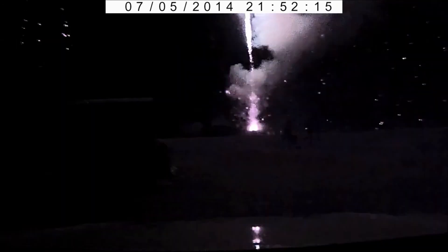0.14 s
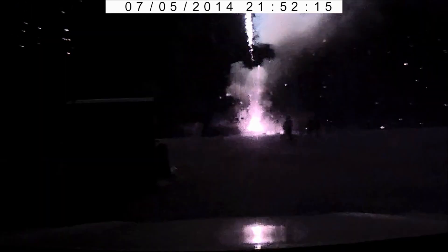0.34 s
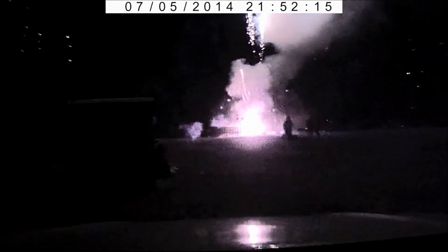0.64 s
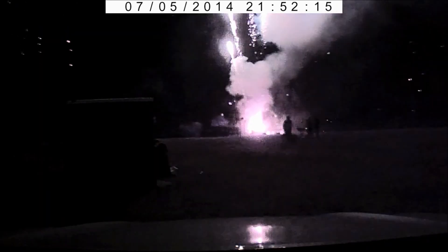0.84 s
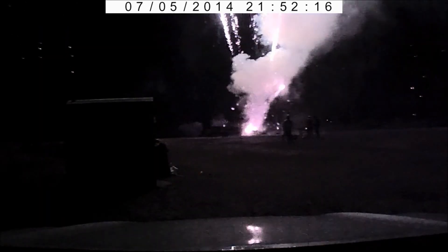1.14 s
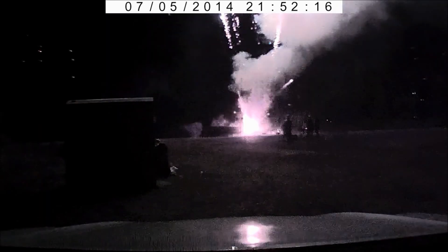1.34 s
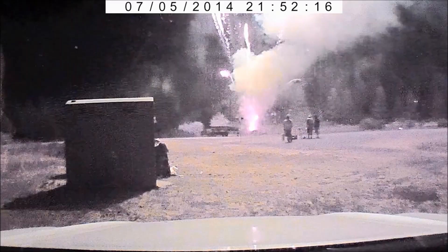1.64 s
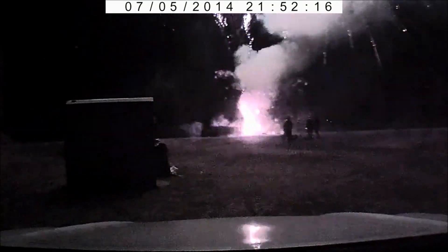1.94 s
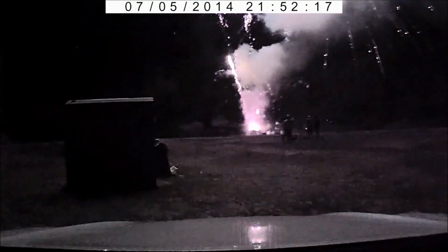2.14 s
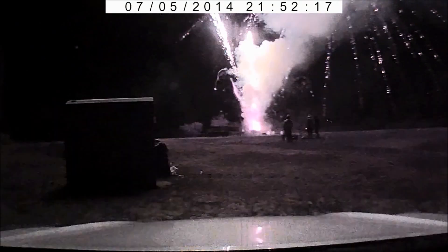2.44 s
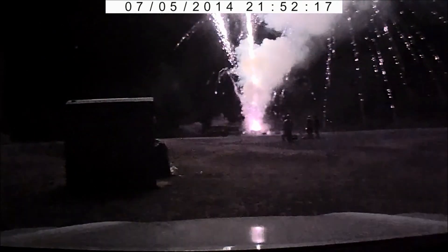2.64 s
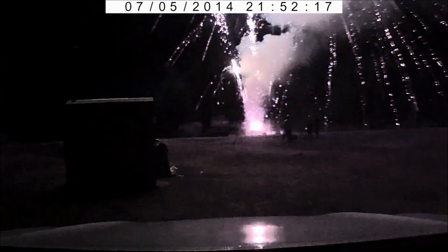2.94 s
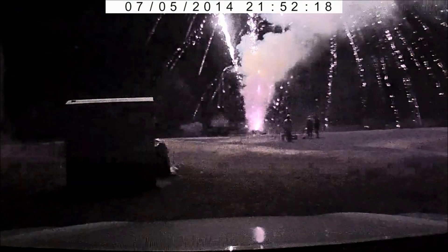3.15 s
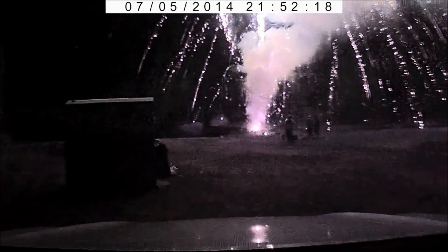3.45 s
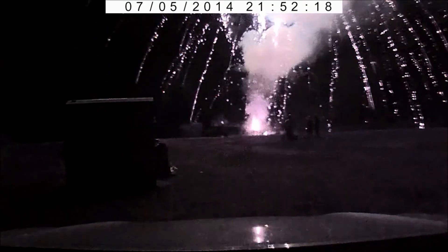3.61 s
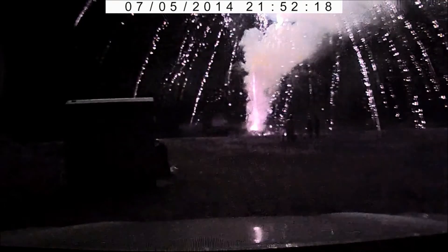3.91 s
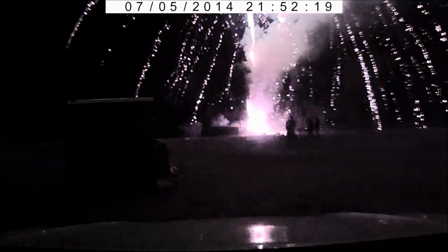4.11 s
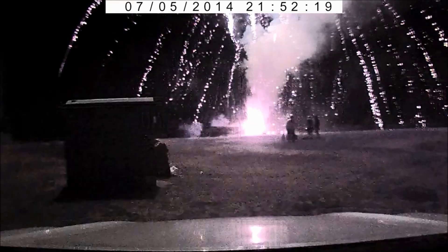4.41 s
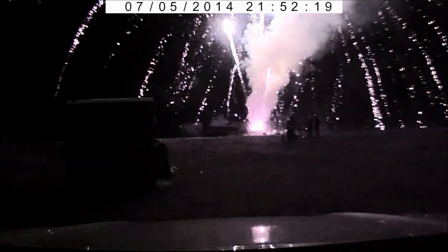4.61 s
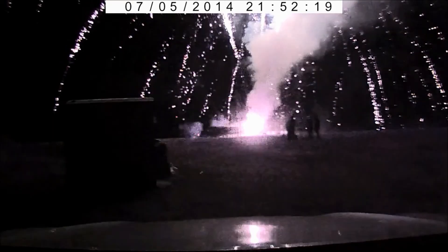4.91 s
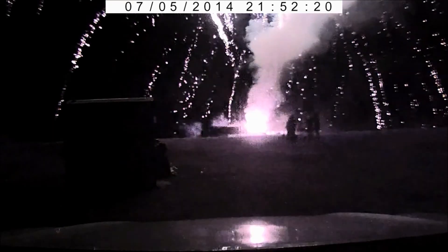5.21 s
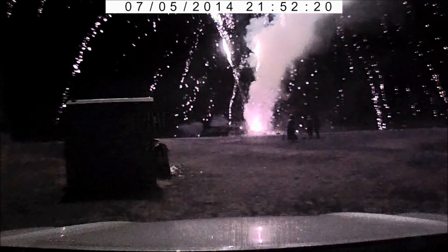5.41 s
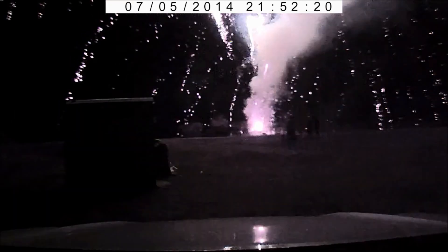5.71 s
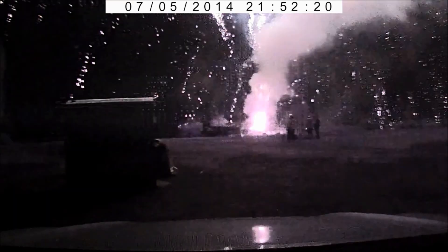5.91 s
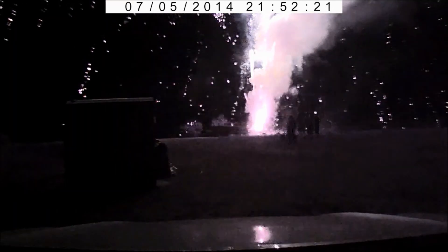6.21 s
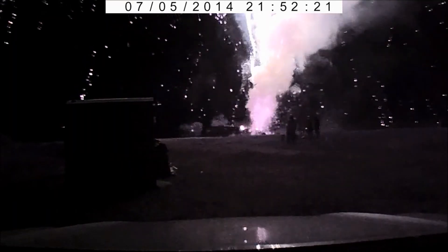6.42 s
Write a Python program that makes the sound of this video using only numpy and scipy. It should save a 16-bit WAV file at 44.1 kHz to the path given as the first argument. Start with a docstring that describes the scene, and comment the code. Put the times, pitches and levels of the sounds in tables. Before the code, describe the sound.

Inside a parked car facing a field, a firework battery fires without pause. Crisp shell cracks on small round thumps overlap dull launch booms that slap the windscreen and ring the cabin. A tree line returns each bang as long, low rolling noise. Launches grow heavier after the middle. Faint sparks crackle, and the overloaded microphone flattens peaks with bright grit.

```python
"""A firework battery fires shell after shell in a field, heard by a dash camera inside a parked car.
Over distant rumble and hiss, shells pop overhead from the start, each a noise crack on a small round thump.
The tree line rolls every bang back as long low noise; launches slap the glass and ring the cabin's air modes.
Bright overload grit rides on the big pressure swings; faint sparks crackle at random moments throughout.
The microphone flattens whatever exceeds its full scale."""
import sys
import numpy as np
from scipy import signal
from scipy.fft import rfft, irfft
from scipy.io import wavfile
from scipy.ndimage import uniform_filter1d

SR = 44100
rng = np.random.default_rng(int(sys.argv[2]) if len(sys.argv) > 2 else 0)


def master_out(mix):
    """Clip the mix to full scale and print it as 16-bit PCM to the path in sys.argv[1]."""
    frames = np.transpose(np.atleast_2d(mix))
    ceiling = np.clip(frames, -1, 1)
    pcm = np.round(ceiling * 32767).astype(np.int16)
    wavfile.write(sys.argv[1], SR, pcm)


N = 289296

# The crisp crack of a shell opening. Each row: frequency in Hz, gain in dB.
CRACK_COLOUR = [(30, 27.5), (400, -16.5), (650, 0), (1100, 6), (1800, -10), (2700, -7.5), (3300, -17),
                (4300, -11.5), (5200, -34), (8000, -44), (15000, -49)]
# What the car's shell lets through of a bang. Each row: frequency in Hz, gain in dB.
LAUNCH_COLOUR = [(30, 17), (80, 24), (130, 33), (250, 33.5), (400, 22.5), (650, 17.5), (1000, 14.5),
                 (1500, 7), (2200, -4), (3200, -7), (4000, -4), (5000, -16), (8000, -25.5), (15000, -25.5)]


def undb(db):
    """Decibels to gain."""
    return 10 ** (np.asarray(db) / 20)


def seconds(length):
    """Time axis of a sound, in seconds."""
    return np.arange(int(length * SR)) / SR


def fade(t, t60):
    """Exponential decay, 60 dB down after t60 seconds."""
    return np.exp(-np.log(1000) * t / t60)


def add(track, s, sound):
    """Mix a sound into a track at time s."""
    i = max(int(s * SR), 0)
    track[i:i + len(sound)] += sound[:N - i]


def convolve(x, response):
    """Pass a track through a response."""
    return signal.fftconvolve(x, response)[:N]


def colour(x, points, size=8192):
    """Causal minimum-phase filter through (Hz, dB) points, built from the cepstrum."""
    hz, db = np.transpose(points)
    grid = np.maximum(np.arange(size // 2 + 1) * SR / size, 1)
    gain = undb(np.interp(np.log(grid), np.log(hz), db))
    cepstrum = irfft(np.log(gain))
    # Folding the cepstrum onto positive time makes the response causal
    cepstrum[1:size // 2] *= 2
    cepstrum[size // 2 + 1:] = 0
    return convolve(x, irfft(np.exp(rfft(cepstrum))))


def lowpass(x, hz):
    """Gentle second-order low-pass."""
    sections = signal.butter(2, min(hz, .45 * SR), fs=SR, output="sos")
    return signal.sosfilt(sections, x)


def reflections(t, rise_s, decay_s, ragged_db, hold=0.77):
    """Noise cloud of uneven clumps, about unit energy; hold above 1 keeps it up, then drops it faster."""
    knots = np.arange(0, t[-1], .003)
    clumps = undb(ragged_db * np.interp(t, knots, rng.standard_normal(len(knots))))
    rise = 1 - np.exp(-t / rise_s)
    decay = fade((t / decay_s) ** hold, 0.93)
    envelope = rise * decay * clumps
    return rng.standard_normal(len(t)) * envelope / np.linalg.norm(envelope)


def background():
    """Distant rumble and microphone hiss: steady noise, strongest in the bass."""
    # Each row: frequency in Hz, level in dB
    floor = [(25, -38), (48, -14), (80, -13.5), (140, -22.5), (300, -35.5), (600, -40.5), (1100, -39),
             (1800, -55.5), (3900, -59), (5000, -69), (15000, -71.5)]
    return colour(rng.standard_normal(N), floor)


def hollow_note(t, start_hz, end_hz, fall_s, t60, db, vary=.05):
    """The hollow note of a charge going off in its card casing; it sinks as the hot gas cools."""
    hz = end_hz + (start_hz - end_hz) * np.exp(-t / fall_s)
    hz = hz * (1 + vary * rng.standard_normal())  # each charge is tuned a little differently
    tone = np.cos(2 * np.pi * np.cumsum(hz) / SR)
    return undb(db) * tone * fade(t, t60) * (1 - np.exp(-t / 0.0025))


def thump(t, rise_s, scatter_db, detune):
    """The cabin's modes after a pressure step; each direction of arrival weights them a little differently."""
    # Air and panel modes of the car. Each row: nominal frequency in Hz, relative level in dB, t60 in seconds
    cabin_modes = [(45.2, -27, 0.56), (52.5, -24, 0.49), (113.5, -29.5, 0.72), (130, -18, 0.082),
                   (150.8, -23.5, 0.26), (168.7, -17, 0.2), (183.3, -23, 0.29), (222.8, -12, 0.14),
                   (262.8, -19, 0.21), (297, -22.5, 0.11), (340.5, -27, 0.2), (430, -28.5, 0.061),
                   (494, -29, 0.21), (543, -30.5, 0.18), (623, -10.5, 0.042), (684.3, -22, 0.075),
                   (977, -25.5, 0.055), (1060, -31, 0.051)]
    hz, db, t60 = np.transpose(cabin_modes)[:, :, None]
    weight, shift = rng.standard_normal((2, len(cabin_modes), 1))
    level = undb(db + scatter_db * weight)
    tones = np.cos(2 * np.pi * hz * (1 + detune * shift) * t)
    modes = level * fade(t, t60) * tones
    return modes.sum(axis=0) * (1 - np.exp(-t / rise_s))  # the panels take a moment to give way


def bursts(scatter_db=-6, boom_db=-0.5):
    """Shells open high up: a short crisp crack on a small, round thump."""
    # The nearer shells overhead. Each row: start in seconds, crack level in dB
    shells = [(0.029, 1), (0.043, -2.5), (0.44, 1.5), (.582, 2), (0.7345, -5.5), (0.8594, 2.5),
              (1.0258, 0.5), (1.149, -0.5), (1.199, -11), (1.342, -11), (1.4966, 6), (1.579, 7.5),
              (1.627, 3), (1.7345, -0.5), (1.8374, -14.5), (2.197, 2), (3.079, -1.5), (3.2497, 1.5),
              (4.006, -1), (4.219, -2), (4.319, 4.5), (4.485, -3), (4.608, 1), (5.1166, 5), (5.4254, -2),
              (5.444, 5), (5.6731, 2), (6.0684, -1), (6.181, -3.5), (6.2556, 2.5), (6.3461, 3.5),
              (6.4611, 0)]
    t = seconds(.5)
    boom, scattered, crack = np.zeros((3, N))
    for s, crack_db in shells:
        thump_db = -11.5 + crack_db  # the thump follows the crack's level
        add(crack, s, undb(crack_db) * reflections(t, rise_s=0.00027, decay_s=0.14, ragged_db=2))
        cloud = reflections(t, rise_s=0.0032, decay_s=0.093, ragged_db=6.0, hold=0.96)
        add(scattered, s, undb(thump_db + scatter_db) * cloud)
        note = hollow_note(t, start_hz=185.4, end_hz=127.8, fall_s=0.032, t60=0.11, db=-5.0)
        cabin = thump(t, rise_s=0.019, scatter_db=4.5, detune=0.0098)
        add(boom, s, undb(thump_db + boom_db) * (note + cabin))
    return boom + colour(scattered, LAUNCH_COLOUR) + colour(crack, CRACK_COLOUR)


def tree_line(bangs, short_db=-3, long_db=-1.5):
    """A short return swells and dies soon; a long, low roll lasts beyond it."""
    # Spectrum of the returned sound. Each row: frequency in Hz, gain in dB
    echo_colour = [(30, -3.5), (52, -12.5), (85, -12.5), (160, -18), (400, -19.5), (1100, -22),
                   (2000, -19.5), (3800, -19), (6000, -41), (15000, -23)]
    t = seconds(2)
    short_return = undb(short_db) * reflections(t, rise_s=0.05, decay_s=0.29, ragged_db=6.0)
    long_roll = undb(long_db) * reflections(t, rise_s=.025, decay_s=1.27, ragged_db=2.5)
    return colour(convolve(bangs, short_return + long_roll), echo_colour)


def knock(t):
    """The windscreen's own quick knock: the glass answers the shock front at once."""
    # Each row: nominal frequency in Hz, relative level in dB, t60 in seconds
    glass_modes = [(407.2, -17.5, .07), (663, -19, 0.13), (939, -18.5, 0.022), (1212, -28, 0.043)]
    hz, db, t60 = np.transpose(glass_modes)[:, :, None]
    shift = 1 + 0.043 * rng.standard_normal((len(glass_modes), 1))
    modes = undb(db) * fade(t, t60) * np.sin(2 * np.pi * hz * shift * t)
    return modes.sum(axis=0)


def launches(front_gain=0.18, front_hz=1100, slap_s=.0044, slap_gain=0.76, slap_hz=11000):
    """A dull shock front, the windscreen's hard slap after it, then reflections, while tube and cabin boom."""
    # Lift charges, all of one make. Each row: start in seconds, level in dB
    charges = [(0.0689, -4), (0.1433, -0.5), (0.2712, -0.5), (0.5327, 0.5), (0.789, -3), (1.521, 4),
               (1.9761, 1), (2.0543, 0.5), (2.344, 0.5), (2.4824, -2), (2.8002, 7.5), (2.9353, 6),
               (3.1741, 3.5), (3.4302, 6.5), (3.558, 4), (3.7782, 3), (3.8107, 9), (3.921, 2),
               (4.1646, 7.5), (4.2614, 2.5), (4.3946, 2), (4.7245, 4.5), (4.8902, 3.5), (5.152, 1),
               (5.2236, 4.5), (5.7694, 4), (5.9642, 9.5), (6.2729, 5)]
    scatter_db, knock_db, cabin_db = 3.5, -4, -1.5  # relative to the charge's level
    t = seconds(.5)
    boom, front, slap, scattered = np.zeros((4, N))
    for s, db in charges:
        # Front and slap are single-sample clicks, softened by the low-passes below
        add(front, s, np.array([front_gain * undb(db)]))
        add(slap, s + slap_s, np.array([slap_gain * undb(db)]))
        cloud = reflections(t, rise_s=0.0058, decay_s=0.13, ragged_db=3.5, hold=1.296)
        add(scattered, s, undb(db + scatter_db) * cloud)
        tube = hollow_note(t, start_hz=198.1, end_hz=89.3, fall_s=0.021, t60=0.13, db=-4.5)
        cabin = undb(cabin_db) * thump(t, rise_s=0.0061, scatter_db=2.5, detune=0.015)
        add(boom, s, undb(db) * (undb(knock_db) * knock(t) + tube + cabin))
    shock = lowpass(front, front_hz) + lowpass(slap, slap_hz)
    return boom + colour(shock + scattered, LAUNCH_COLOUR)


def overload_grit(pressure, threshold=0.32, spread_db=3, grain_t60=0.0037, grit_db=3.5):
    """Bright gritty treble bursts whenever the pressure swings past a threshold, stronger in big swings."""
    # Colour of the overload grit. Each row: frequency in Hz, gain in dB
    grit_colour = [(500, -27), (2000, -32), (4000, -34.5), (7000, -41), (9000, -31.5), (11000, -57),
                   (15000, -64)]
    over = np.abs(pressure) > threshold
    crossings = np.diff(over, prepend=False) & over  # only the moment of crossing
    force = np.tanh(uniform_filter1d(np.abs(pressure), size=300) / 0.5)
    spread = undb(spread_db * np.clip(rng.standard_normal(N), -2, 2))
    hits = crossings * force * spread
    # Grain energies add up, so the decay runs on squared hits at twice the rate
    energy = signal.lfilter([1], [1, -fade(2 / SR, grain_t60)], hits ** 2 + 1e-18)
    grains = np.sqrt(energy) * rng.standard_normal(N)
    return undb(grit_db) * colour(grains, grit_colour)


def sparks(count=28, faintest_db=-20, range_db=8):
    """Burning stars and the smallest shells crackle faintly at random moments."""
    t = seconds(.1)
    ticks = np.zeros(N)
    for when, strength in rng.random((count, 2)):
        tick = reflections(t, rise_s=0.0007, decay_s=0.067, ragged_db=4.5)
        add(ticks, when * N / SR, undb(faintest_db + range_db * strength) * tick)
    return colour(ticks, CRACK_COLOUR)


def scene():
    """Everything as it reaches the windscreen microphone, with the overload grit on top."""
    bangs = bursts() + launches()
    pressure = bangs + tree_line(bangs) + sparks()
    return (background() + pressure + overload_grit(pressure))[None]


def record(dry):
    """The camera's input flattens every swing at full scale, then a steep filter cuts the top."""
    full_scale, top_hz = .505, 15900
    clipped = np.clip(dry, -full_scale, full_scale)
    top_cut = signal.ellip(10, .1, 70, top_hz, fs=SR, output="sos")
    return signal.sosfilt(top_cut, clipped)


dry = scene()
out = record(dry)
master_out(out)
```